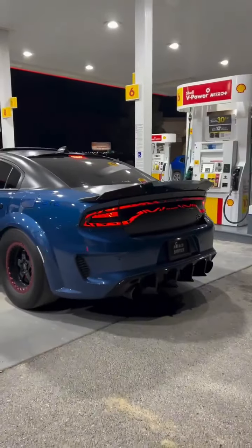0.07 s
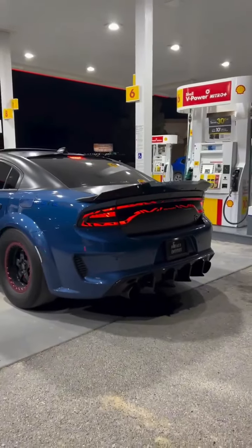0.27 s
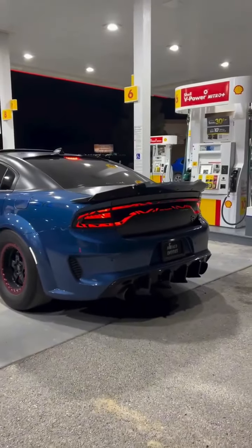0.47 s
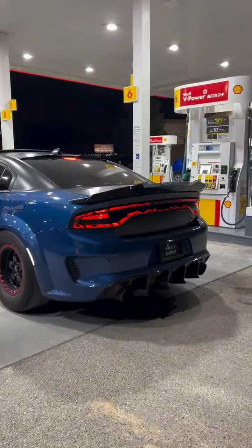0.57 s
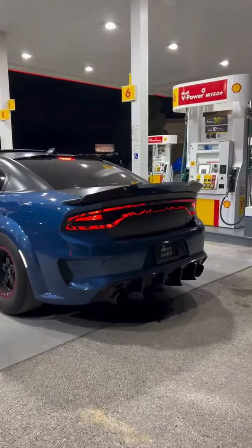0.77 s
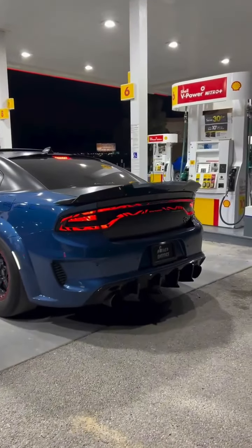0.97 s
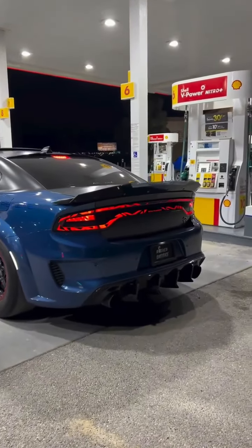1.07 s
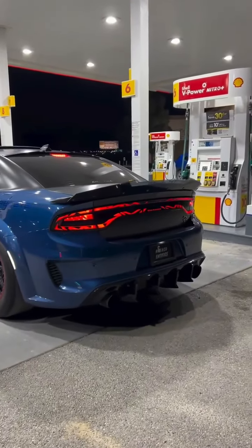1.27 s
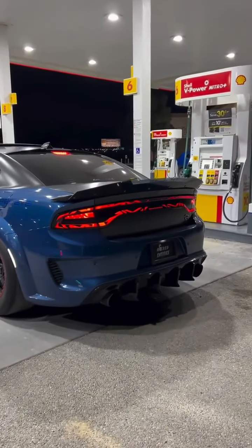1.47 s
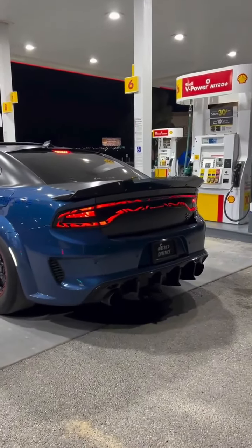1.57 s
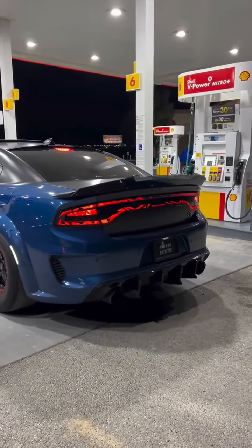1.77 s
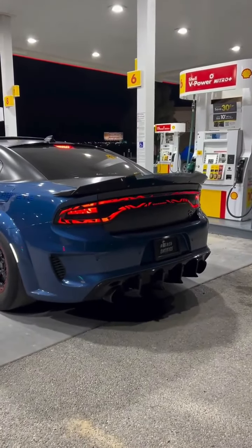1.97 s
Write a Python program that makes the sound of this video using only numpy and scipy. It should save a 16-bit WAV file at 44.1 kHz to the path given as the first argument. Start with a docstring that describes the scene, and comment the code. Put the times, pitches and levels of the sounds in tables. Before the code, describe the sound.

Loud V8 cold start from behind: starter whine, explosive catch, crackling flare, then lumpy fast idle

```python
"""A big V8 starts on a paved forecourt at night, heard from behind the tailpipes.
First the starter solenoid clacks: short rattles that ring like metal. The starter then grinds, made of
uneven clicks in noise, and whines with its gears over five compression strokes. Single cylinders bang as
bursts of noise. The engine flares up with a clean drone of sine waves and a crackle of noise puffs, then
settles into a lumpy fast idle. Low noise of the forecourt lies under everything."""
import sys
import numpy as np
from scipy import signal
from scipy.fft import rfft, irfft
from scipy.io import wavfile
from scipy.ndimage import uniform_filter1d

SR = 44100
rng = np.random.default_rng(int(sys.argv[2]) if len(sys.argv) > 2 else 0)


def file_out(sig):
    """Save sig as 16-bit WAV at sys.argv[1]."""
    # one column per channel
    cols = np.atleast_2d(sig).T
    # limit, then scale
    lim = np.clip(cols, -1, 1)
    pcm = np.round(lim * 32767).astype(np.int16)
    wavfile.write(sys.argv[1], SR, pcm)


def ratio(d):
    """dB to gain"""
    e = np.asarray(d, float) / 20
    return 10 ** e


N = 88640
T = np.arange(N) / SR  # time of each sample [s]

# Colour of the exhaust crackle: (frequency [Hz], level per Hz [dB])
CRACKLE_COLOUR = [(400, -40), (620, -3.5), (850, 1.5), (1250, 1), (1700, -2), (2600, -4), (3600, -13),
                  (5000, -44.5)]
# Treble colour of engine, bangs and starter: (frequency [Hz], level per Hz [dB])
HISS_COLOUR = [(1900, 2.5), (3300, -1.5), (4300, -3), (8500, -3.5), (10200, -6), (11000, -19.5)]


def engine():
    """Each firing sends a pulse down the pipes and a puff of crackle and hiss out of them."""
    # Running of the engine: (time [s], firing rate [Hz], drone level [dB], uneven low burble level [dB])
    running = [(.905, 64, -18, -20), (.948, 67.13, -11, -15.5), (.97, 60.75, -31, -28.5),
               (1.004, 60.79, -15, -14.5), (1.06, 63.4, -10, -20), (1.11, 80.35, -15, -18),
               (1.2, 96.98, -10, -24.5), (1.3, 107.6, -12, -33), (1.42, 110.3, -14, -23),
               (1.62, 110.7, -19, -26.5), (1.7, 110.1, -31.5, -20), (1.87, 107.4, -22, -21.5),
               (2.01, 104.4, -21, -14.5)]
    # Exhaust noise: (time [s], pipe bark level [dB], crackle level [dB], hiss level [dB])
    exhaust_levels = [(.99, -20.5, -26.5, -27), (1.05, -18.5, -22.5, -29), (1.17, -17.5, -24, -26.5),
                      (1.34, -16.5, -24.5, -29.5), (1.45, -16, -25, -34), (1.62, -24.5, -33, -43.5),
                      (1.72, -25, -39.5, -51), (1.88, -28, -36.5, -43), (2.01, -26, -38.5, -40.5)]
    # Strength of each cylinder in firing order: (level [dB])
    cylinder_levels = [0, -4, 2, -6, 1, -2, 3, -5]
    # Colour of the bark: (frequency [Hz], level per Hz [dB])
    bark_colour = [(100, -20.5), (230, 5.5), (350, 12), (480, 3), (600, -42.5), (900, -39.5)]
    # Pipe resonances: (frequency [Hz], width [Hz], level [dB])
    pipe = [(307.5, 18, -2), (354.2, 18.7, 1.5), (456.2, 44.3, -3.5)]
    # Tones of the firing order: (multiple of the full cycle, level [dB])
    burble_tones = [(4, -8), (6, 2.5), (11, 3.5), (14, -5)]
    # Each puff rings around one of these pitches: (frequency [Hz])
    spit_hz = [1020, 1220, 1440, 1726]
    catch_s, running_s = .892, .978  # the low tones start, then all cylinders fire
    puff_share, spread_db = .21, 1.7  # time to the puff's peak, in firing gaps; chance between firings
    arrival_spread_s = .0006  # pulses reach the tailpipe a little early or late

    firings = np.cumsum(curve(running, index=1)) / SR
    number = (firings + .35).astype(int)
    since = (firings + .35) % 1 / puff_share  # time since the firing, 1 at the puff's peak
    luck = rng.standard_normal((400, 3))
    spit = rng.integers(0, len(spit_hz), 400)
    cylinder_db = np.array(cylinder_levels)[number % 8]
    noise = rng.standard_normal((3, N))

    drone = np.sqrt(2) * np.sin(2 * np.pi * firings) * ratio(curve(running, index=2))
    burble = np.zeros(N)
    for multiple, db in burble_tones:
        loudness, phase = slow_waver(), slow_waver()
        angle = 2 * np.pi * round(multiple) * firings / 8 + .85 * phase
        burble += ratio(db + 4 * loudness) * np.sin(angle)
    low = drone + ratio(curve(running, index=3)) * evened(burble)

    pulses = np.zeros(N)
    at = np.flatnonzero(np.diff(number)) + 1
    late = (arrival_spread_s * SR * luck[number[at], 2]).astype(int)
    pulses[np.clip(at + late, 0, N - 1)] = ratio(cylinder_db + 4.5 * luck[number, 0])[at]
    drive = evened(pulses) + 1.66 * noise[0]
    bark = evened(colour(drive, bark_colour)) + .8 * evened(bank(drive, pipe))

    puff = 2 * since * np.exp(-since) * ratio(0.41 * cylinder_db + spread_db * luck[number, 1])
    rings = np.zeros(N)
    for k, hz in enumerate(spit_hz):
        rings += resonate(puff * noise[1] * (spit[number] == k), hz, width=650)
    crackle = colour(evened(rings) + 1.3 * evened((0.41 + puff) * noise[1]), CRACKLE_COLOUR)
    crackle = crackle + .3 * canopy(crackle)
    hiss = colour((3.2 + puff) * noise[2], HISS_COLOUR)

    exhaust = levelled(bark, curve(exhaust_levels, index=1))
    exhaust += levelled(crackle, curve(exhaust_levels, index=2))
    exhaust += levelled(hiss, curve(exhaust_levels, index=3))
    low_fade = np.clip((T - catch_s) / 0.019, 0, 1)
    exhaust_fade = np.clip((T - running_s) / 0.0023, 0, 1)
    return low * low_fade + exhaust * exhaust_fade


def slow_waver():
    """A slow random wander, made by smoothing noise twice."""
    return evened(resonate(resonate(rng.standard_normal(N), 0, 26), 0, 26))


def bangs():
    """Loud single firings: a short burst around one pitch, a spit of treble and a thump."""
    # Single firings, levels before they fade:
    # (time [s], crackle level [dB], crackle pitch [Hz], treble level [dB], thump level [dB])
    firings = [(0.895, -16, 1820, -29, -18.5), (.925, -17, 1000, -13.5, -13.5), (.977, -13, 1690, -32, -11),
               (1.078, -14, 1300, -30, -15), (1.136, -14, 1150, -33, -20), (1.223, -15, 1200, -35, -22),
               (1.289, -12.5, 1500, -33, -16), (1.373, -14.5, 1350, -35, -20),
               (1.915, -26.5, 900, -36, -18.5), (1.989, -27, 1070, -59, -35)]
    # Resonances of the thump: (frequency [Hz], width [Hz], level [dB])
    thump_modes = [(162, 32, 3.5), (374, 63, -5)]
    burst_t60_s, thump_t60_s = 0.099, .2  # time to fade by 60 dB
    out, t = np.zeros(N), np.arange(6000) / SR
    burst_shape = np.minimum(t / .004, 1) * ratio(-60 * t / burst_t60_s)
    thump_shape = np.minimum(t / .015, 1) * ratio(-60 * t / thump_t60_s)
    for s, db, hz, top_db, thump_db in firings:
        a, b, c = rng.standard_normal((3, len(t)))
        pitched = evened(resonate(a, hz, 280))
        crackle = evened(pitched + 0.45 * evened(colour(a, CRACKLE_COLOUR)))
        treble = evened(colour(b, HISS_COLOUR))
        add(out, s, burst_shape * (ratio(db) * crackle + ratio(top_db) * treble))
        add(out, s, thump_shape * ratio(thump_db) * evened(bank(c, thump_modes)))
    return out


def starter():
    """Gear teeth grind in the housing and whine on each stroke; air chuffs softly through the pipes."""
    # Cranking: (time [s], low chuff level [dB], steady grind level [dB], treble level of the grind [dB])
    cranking = [(.04, -53, -44, -35), (.11, -40.5, -42, -40), (.22, -45, -39, -41.5), (.31, -38, -41, -51),
                (.4, -57, -40.5, -36.5), (.52, -48, -45, -42.5), (.73, -37, -41.5, -39.5),
                (.88, -46, -43, -33.5)]
    # Colour of the grind: (frequency [Hz], level per Hz [dB])
    grind_colour = [(200, -22.5), (420, 0), (600, 0.5), (1100, 7), (2500, 5), (3200, 6.5), (4200, -35.5)]
    # Housing resonances: (frequency [Hz], width [Hz], level [dB])
    housing = [(775, 35, 1), (1790, 40, 2), (2460, 55, 1)]
    # Colour of the chuff: (frequency [Hz], level per Hz [dB])
    chuff_colour = [(25, -7), (62, 11), (130, 7.5), (230, -13), (600, -37)]
    # Upper resonances of the spinning starter: (frequency [Hz], width [Hz], level [dB])
    whirr = [(2354, 29, 11.5), (2730, 63, -0.5)]
    # The starter runs free over each compression: (time [s])
    stroke_times = [.378, .525, .638, .72, .812]
    # Each stroke as it begins: (length [s], level [dB], gear mesh [Hz], treble level [dB])
    strokes = [(0.12, -33.5, 860, -64), (0.0797, -30.5, 1090, -38.5), (0.056, -30, 1080, -37.5),
               (0.041, -29.5, 1060, -34), (0.069, -33, 1130, -37)]
    # Tones of the gear whine: (multiple of the mesh, level [dB])
    mesh_tones = [(1, 3), (2, 3), (3, -3)]
    mesh_sag, fade_db = 0.09, -9  # drop of the mesh pitch (as a share) and of the level over a stroke's length
    mesh_width_hz = 50  # roughness of the whine

    drive = teeth(N)
    grind = evened(resonate(colour(drive, grind_colour), 0, 2600)) + .25 * evened(bank(drive, housing))
    chuff = colour(rng.standard_normal(N), chuff_colour)
    treble = evened(colour(teeth(N), HISS_COLOUR)) + 0.57 * evened(bank(drive, whirr))
    out = ratio(curve(cranking, index=1)) * evened(chuff)
    out += ratio(curve(cranking, index=2)) * evened(grind)
    out += ratio(curve(cranking, index=3)) * evened(treble)

    t = np.arange(9000) / SR
    for s, (length, db, mesh_hz, top_db) in zip(stroke_times, strokes):
        drive = teeth(len(t))
        turns = mesh_hz * (t - mesh_sag * t ** 2 / (2 * length))
        whine = np.zeros(len(t))
        for multiple, tone_db in mesh_tones:
            rough = evened(.9 + evened(resonate(teeth(len(t)), 0, mesh_width_hz)))
            whine += ratio(tone_db) * np.cos(2 * np.pi * round(multiple) * turns) * rough
        rub = .55 * evened(colour(drive, grind_colour)) + evened(bank(drive, housing))
        body = evened(1.4 * evened(whine) + rub)
        shape = np.minimum(t / .016, 1) * ratio(fade_db * (t / length) ** 2)
        add(out, s, shape * (ratio(db) * body + ratio(top_db) * evened(colour(drive, HISS_COLOUR))))
    fade_in = np.clip((T - .032) / 0.0041, 0, 1)
    fade_out = np.clip((1.0 - T) / 0.0077, 0, 1)
    return out * fade_in * fade_out


def teeth(size):
    """Rattle of gear teeth: uneven clicks in a rub."""
    clicks_per_s = 900  # on average
    clicks = (rng.random(size) < clicks_per_s / SR) * rng.standard_normal(size)
    return evened(.5 * evened(clicks) + rng.standard_normal(size))


def solenoid():
    """Metal hits of solenoid and pinion: a rattling burst sets off ringing modes."""
    # Hits: (time [s], peak level [dB])
    clacks = [(0.037, -19), (0.05, -23)]
    # Colour of the rattle: (frequency [Hz], level per Hz [dB])
    rattle_colour = [(250, -29), (1100, -6), (2400, -9.5), (3300, -33), (4500, -0.5), (7500, -3.5),
                     (10400, -18.5)]
    # Ringing modes, each dying by 60 dB in about 0.28 of its ring scale; longer ones are boosted:
    # (frequency [Hz], level before the boost [dB], ring scale [s])
    modes = [(431, 7, 0.23), (1077, 9, 0.041), (4510, 5, 0.035), (7070, 0, 0.21)]
    rattle_t60_s = 0.097  # time to fade by 60 dB
    out, t = np.zeros(N), np.arange(9000) / SR
    shape = np.minimum(t / 0.0006, 1) * ratio(-60 * t / rattle_t60_s)
    for s, db in clacks:
        rattle = rng.standard_normal(len(t)) * shape
        ring = np.zeros(len(t))
        for hz, mode_db, scale_s in modes:
            ring += ratio(mode_db) * resonate(rattle, hz, 7.9 / scale_s) * np.sqrt(scale_s)
        hit = evened(colour(rattle, rattle_colour)) + evened(ring)
        add(out, s, ratio(db) * hit / np.abs(hit).max())
    return out


def canopy(x):
    """Sparse reflections from roof and ground: random echoes that die away quickly."""
    t60_s = 0.063  # time to fade by 60 dB
    taps = np.zeros(SR // 2)
    at = np.arange(200, len(taps) - 20, 20)
    at = at + rng.integers(0, 20, len(at))
    taps[at] = rng.choice([-1., 1.], len(at)) * ratio(-60 * at / SR / t60_s)
    return signal.oaconvolve(x, taps / np.linalg.norm(taps))[:N]


def forecourt_air():
    """Steady low rumble of the forecourt: noise that is strongest in the lows."""
    # Colour of the air: (frequency [Hz], level per Hz [dB])
    air_colour = [(60, 3.5), (450, -11.5), (1500, -21.5), (10000, -49.5)]
    return ratio(-38.5) * evened(colour(rng.standard_normal(N), air_colour))


def evened(x):
    """Scales a sound to an average (rms) level of 1."""
    return x / np.sqrt(np.mean(x ** 2) + 1e-20)


def curve(table, index):
    """One column of a table, drawn as straight lines over time."""
    rows = np.array(table)
    return np.interp(T, rows[:, 0], rows[:, index])


def colour(x, points):
    """Filters a sound to the given spectrum without any sound ahead of its cause."""
    f, db = np.transpose(points)
    hz = np.abs(np.fft.fftfreq(8192, 1 / SR))
    level = np.interp(np.log(hz + 1), np.log(f + 1), np.maximum(db, -90))
    log_gain = level * np.log(10) / 20
    # the Hilbert transform gives the phase that makes the filter react at once
    taps = np.fft.ifft(np.exp(np.conj(signal.hilbert(log_gain)))).real[:4096]
    return signal.oaconvolve(x, taps)[:len(x)]


def resonate(x, hz, width):
    """A resonance of gain near 1 at its pitch; at 0 Hz it smooths the sound instead."""
    r = np.exp(-np.pi * width / SR)
    return 2 * signal.lfilter([1 - r], [1, -r * np.exp(2j * np.pi * hz / SR)], x).real


def bank(x, table):
    """Several resonances side by side, with alternating sign."""
    return sum((-1) ** k * ratio(db) * resonate(x, hz, width) for k, (hz, width, db) in enumerate(table))


def add(mix, s, sound):
    """Adds a sound to the mix from a time in seconds."""
    part = mix[round(s * SR):][:len(sound)]
    part += sound[:len(part)]


def levelled(x, db, window_s=.1):
    """Holds the slow level of a sound on a curve."""
    size = round(window_s * SR)
    power = uniform_filter1d(uniform_filter1d(x ** 2, size), size)
    return ratio(db) * x / np.sqrt(np.abs(power) + 1e-20)


def shaped(x, points):
    """Changes the gain by frequency without delay."""
    f, db = np.transpose(points)
    hz = np.fft.rfftfreq(N, 1 / SR)
    gain = ratio(np.interp(np.log(hz + 1), np.log(f + 1), db))
    return irfft(rfft(x) * gain, N)


def scene():
    """All sources near the middle, with reflections spread left and right."""
    # Gain of the reflections that differ left and right: (frequency [Hz], level [dB])
    side_gain = [(200, -88), (600, -37), (1300, -99), (2300, -5.5), (5000, -3), (10000, -10.5)]
    # Lean of the middle sound: (frequency [Hz], left minus right level [dB])
    lean = [(200, 0), (450, 1.2), (1200, 2.4), (2200, -1.4), (3800, .2)]
    hits = bangs() + solenoid()
    mid = engine() + starter() + hits + ratio(-6) * canopy(hits)
    mid = mid + forecourt_air()
    side = shaped(canopy(mid), side_gain)
    left = shaped(mid, [(f, d / 2) for f, d in lean]) + side
    right = shaped(mid, [(f, -d / 2) for f, d in lean]) - side
    return np.array([left, right])


def top_cut(x):
    """Nothing passes above the cut-off."""
    return signal.sosfilt(signal.butter(12, 11690, fs=SR, output="sos"), x)


def record(dry):
    """Microphone low cut, soft overload that rounds off loud peaks, then a treble limit."""
    low_cut = signal.butter(2, 38, "high", fs=SR, output="sos")
    treble_cut = signal.butter(10, 10600, fs=SR, output="sos")
    cut = signal.sosfilt(low_cut, dry)
    overloaded = 1.39 * np.tanh(cut / 1.105)
    mix = signal.sosfilt(treble_cut, overloaded)
    return top_cut(mix)


dry = scene()
out = record(dry)
file_out(out)
```